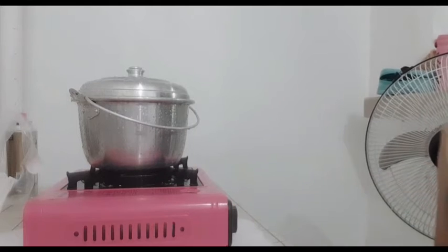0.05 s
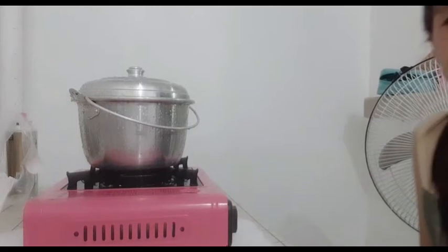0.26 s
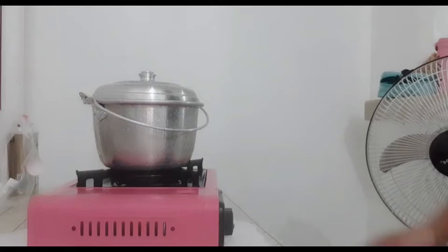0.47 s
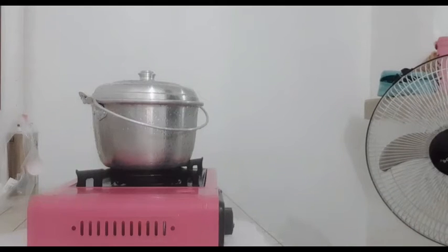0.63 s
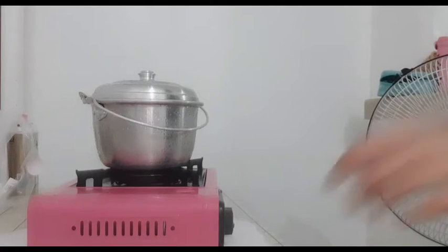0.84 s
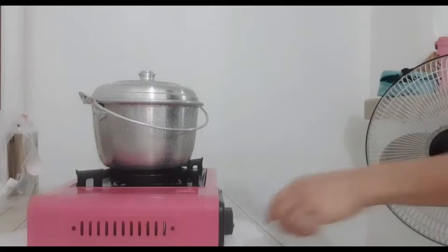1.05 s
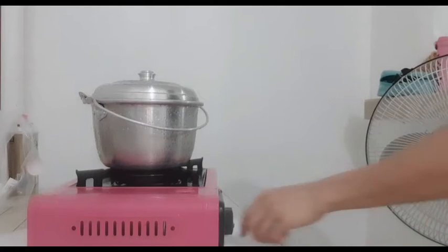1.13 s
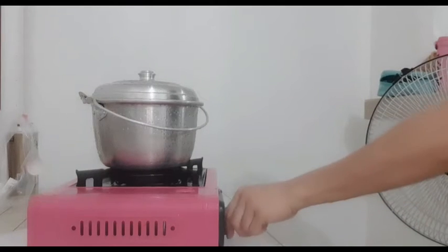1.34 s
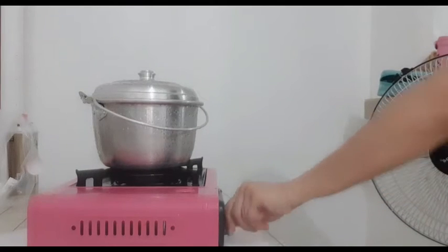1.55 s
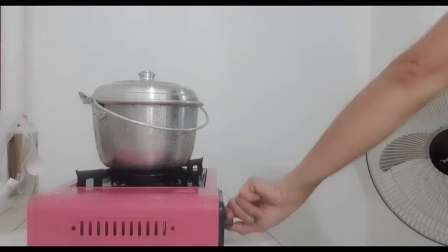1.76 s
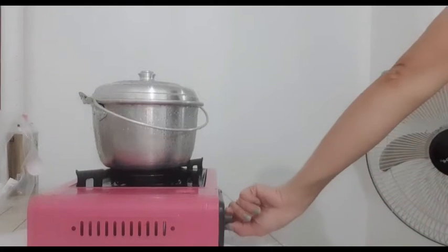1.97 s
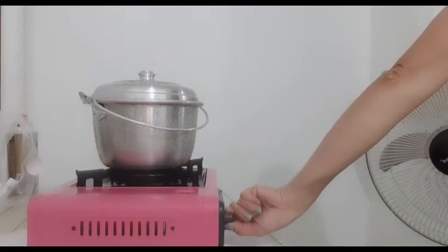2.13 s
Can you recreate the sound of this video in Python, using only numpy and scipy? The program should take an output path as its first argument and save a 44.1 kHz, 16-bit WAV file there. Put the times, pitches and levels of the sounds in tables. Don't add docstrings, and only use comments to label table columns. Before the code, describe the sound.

Portable gas stove igniter snaps with a metallic ring after latch clatter and bumps, then gas hisses softly

```python
import sys
import numpy as np
from scipy import signal
from scipy.fft import rfft, irfft
from scipy.io import wavfile
from scipy.ndimage import uniform_filter1d

SR = 44100
rng = np.random.default_rng(int(sys.argv[2]) if len(sys.argv) > 2 else 0)


def log_audio(samples):
    frames = np.atleast_2d(samples).T
    limited = np.clip(frames, -1, 1)
    pcm = np.round(limited * 32767).astype(np.int16)
    wavfile.write(sys.argv[1], SR, pcm)


def voltage_ratio(level):
    return 10 ** (np.asarray(level, float) / 20)


N = 97020
T = np.arange(N) / SR


def unit(x):
    return x / np.sqrt(np.mean(x ** 2))


def colour(x, shape):
    hz, db = np.array(shape, float).T
    f = np.maximum(np.fft.rfftfreq(len(x), 1 / SR), 1)
    gain_db = np.interp(np.log(f), np.log(hz), db, left=db[0] - 23)
    return irfft(rfft(x) * voltage_ratio(gain_db), len(x))


def walk(rate_hz):
    k = int(SR / rate_hz)
    drift = uniform_filter1d(rng.standard_normal(N), k)
    return unit(uniform_filter1d(drift, k))


def since(start_s):
    return np.clip(T - start_s, 0, 1)


def room():
    # band centre in Hz, t60 in s.
    decay = [(150, 0.23), (500, 0.58), (1500, 0.47), (4000, 0.43), (8000, 0.33), (14000, 0.41)]
    walls = []
    for hz, t60 in decay:
        band = [(hz / 4, -40), (hz / 2, -5), (hz, 0), (hz * 2, -5), (hz * 4, -40)]
        walls.append((colour(rng.standard_normal(N), band), voltage_ratio(-120 / t60 / SR)))
    return walls


def echoes(env, walls):
    room_db, rise_s = 6.5, 0.0072
    fill = np.exp(-1 / rise_s / SR)
    energy = signal.lfilter([1 - fill], [1, -fill], env ** 2)
    total = sum(np.var(band) / (1 - keep) for band, keep in walls)
    shift = rng.integers(N)
    tail = 0
    for band, keep in walls:
        tail = tail + np.roll(band, shift) * np.sqrt(signal.lfilter([1], [1, -keep], energy))
    return voltage_ratio(room_db) * tail / np.sqrt(total)


def ring(modes):
    t = T[:SR // 2]
    out = 0
    for hz, db, t60 in modes:
        out = out + voltage_ratio(db - 60 * t / t60) * np.sin(2 * np.pi * (hz * t + rng.random()))
    return out


def metal(hits, shape, modes, modes_db, walls):
    hit_rise_s, rattle_per_s, rattle_spread_db, modes_in_room_db = 0.00076, 14000, 1.6, -9
    env = 0
    for s, db, length_s in hits:
        rise = np.clip((T - s) / hit_rise_s, 0, 1)
        env = env + voltage_ratio(db) * rise * np.exp(-since(s) / length_s)
    contact = rng.random(N) < rattle_per_s / SR
    grains = contact * voltage_ratio(rattle_spread_db * rng.exponential(size=N)) * rng.standard_normal(N)
    push = env * unit(grains)
    tail = echoes(env, walls)
    drive = push + voltage_ratio(modes_in_room_db) * tail
    rung = voltage_ratio(modes_db) * signal.fftconvolve(drive, ring(modes))[:N]
    return rung + colour(push + tail, shape)


def latch(walls):
    # start in seconds, level in dB, rattle length in s.
    slide_hits = [
        (.1975, -30.5, 0.0023),
        (.2015, -24.5, 0.0052),
        (.21, -35.5, 0.008),
        (.2195, -27, 0.0096),
        (.2257, -28, 0.007),
        (.2322, -30.5, 0.011),
    ]
    latch_hits = [
        (.238, -26.5, 0.03),
        (.2513, -19, 0.0019),
        (.2545, -15.5, 0.0026),
        (.2605, -30, .004),
        (.2665, -17, 0.0039),
        (.282, -38, 0.009),
        (.30, -27, 0.017),
    ]
    # Hz, dB.
    slide_colour = [(60, -35), (200, -13), (800, 2), (1800, 4), (3200, -5), (5000, -4), (9000, -3),
                    (15500, -11.5)]
    latch_colour = [(60, -3), (150, -3), (300, 4.5), (800, -11.5), (1500, -5.5), (3700, 2.5), (8000, -5),
                    (15500, -8)]
    # Hz, dB, t60 in s.
    case_modes = [(193.4, -2.5, 0.091), (299, -0.5, 0.052), (411, -5, 0.059), (925, -35, 0.02),
                  (1407, -7, 0.059), (2620, -1, 0.012), (3290, 7, 0.017), (4640, -23, .006)]
    slide = metal(slide_hits, slide_colour, case_modes[:5], -31.5, walls)
    return slide + metal(latch_hits, latch_colour, case_modes, -33.0, walls)


def grip(walls):
    # start in seconds, level in dB, rattle length in s.
    tap_hits = [
        (1.2345, -44, 0.001),
    ]
    rub_hits = [
        (1.245, -55.5, 0.045),
    ]
    # Hz, dB.
    grip_colour = [(2500, -32), (4500, -2.5), (5500, -1), (6800, -8.5), (8000, -12), (9500, -5),
                   (11500, -16)]
    # Hz, dB, t60 in s.
    knob_modes = [(5830, 2, 0.0093), (8000, 0, 0.0089), (9230, -0.5, 0.0088), (10300, -10, 0.0095)]
    tap = metal(tap_hits, grip_colour, knob_modes, -14.5, walls)
    return tap + metal(rub_hits, grip_colour, knob_modes, -32, walls)


def knock():
    # start in seconds, level in dB, swell length in s.
    pushes = [
        (1.8145, -43, .012),
    ]
    # Hz, dB, t60 in s.
    panel_modes = [(806, 0, 0.18)]
    out = 0
    for s, db, swell_s in pushes:
        t = since(s)
        for hz, mode_db, t60 in panel_modes:
            level = voltage_ratio(db + mode_db - 60 * t / t60)
            out = out + level * (1 - np.exp(-t / swell_s)) * 2 * np.sin(2 * np.pi * hz * t)
    return out


def igniter(walls):
    # start in seconds, level in dB, rattle length in s.
    turn_hits = [
        (1.812, -44, 0.018),
        (1.819, -47, 0.015),
    ]
    snap_hits = [
        (1.8315, -19.5, 0.0027),
        (1.8355, -19, 0.0056),
        (1.843, -28, .0015),
        (1.8545, -22.5, 0.0025),
        (1.865, -36, 0.037),
    ]
    catch_hits = [
        (2.1955, -31, 0.0016),
    ]
    # Hz, dB.
    turn_colour = [(300, -44), (800, -5), (1500, 7), (2600, -6.5), (3800, 1), (6500, -18), (8000, -11),
                   (11000, -39)]
    snap_colour = [(100, -5), (300, -2.5), (900, -5), (1650, -2), (2300, -4), (3600, 1), (7760, -7.5),
                   (15500, -20)]
    catch_colour = [(500, -9), (1200, 4), (2100, 6.5), (2700, -10), (3600, 6), (4500, -20), (9000, -24)]
    # Hz, dB, t60 in s.
    case_modes = [(391, -13, 0.05), (797, -9, 0.095), (1015, -7.5, 0.16), (1450, -7.5, 0.063),
                  (1660, 2, 0.025), (2090, -10, 0.034), (3200, 0, 0.013), (3800, -18, 0.02),
                  (4960, -6, 0.012), (7700, -6, 0.036), (8100, 3, 0.021), (9200, 9.5, 0.0062)]
    turn = metal(turn_hits, turn_colour, case_modes[1:2], -33, walls)
    snap = metal(snap_hits, snap_colour, case_modes, -32.0, walls)
    return turn + snap + metal(catch_hits, catch_colour, case_modes, -62, walls)


def air(shape, flicker_db):
    bands = 0
    for hz in 30 * 2. ** np.arange(10):
        octave = [(hz / 2, -30), (hz / 1.59, -3), (hz, 0), (hz * 1.357, -3), (hz * 2, -30)]
        bands = bands + voltage_ratio(flicker_db * walk(8.7)) * colour(rng.standard_normal(N), octave)
    return unit(colour(bands, shape))


def whistle(track, waver_hz, flutter_db):
    s, hz, db = np.array(track, float).T
    pitch_hz = np.interp(T, s, hz) + waver_hz * walk(290)
    level_db = np.interp(T, s, db, left=-120) + 2.0 + flutter_db * walk(130)
    return voltage_ratio(level_db) * np.sin(2 * np.pi * np.cumsum(pitch_hz) / SR)


def gas():
    # Hz, dB.
    puff_colour = [(240, -19), (400, 1), (738, -11), (886, -44), (957, -30), (1660, -7), (2750, -17),
                   (3910, -1.5), (15500, -5)]
    seep_colour = [(2000, -22), (4000, -1), (4800, 4), (5600, -7), (6600, -12), (8000, -3.5), (10000, -15)]
    jet_colour = [(710, -21), (1200, -2.5), (1820, -17), (2590, -23), (5260, -3), (6650, -19),
                  (8240, -14.5), (9780, -23), (15500, -29)]
    # time in seconds, pitch in Hz, level in dB.
    high_track = [(1.97, 4790, -69), (2.0, 4920, -68), (2.03, 5060, -55), (2.08, 5250, -59),
                  (2.13, 5150, -77), (2.2, 5480, -69)]
    low_track = [(2.06, 930, -78), (2.08, 925, -63), (2.11, 925, -57.5), (2.15, 925, -58),
                 (2.2, 918, -58.5)]
    upper_track = [(2.05, 1096, -91), (2.07, 1078, -67), (2.11, 1050, -61.5), (2.2, 1015, -72)]
    puff_db, puff_hold_s, puff_fade_db_per_s = -50, 0.021, 53
    seep_db, seep_opens_s, seep_swell_s = -71, 1.536, 0.15
    jet_db, jet_opens_s, jet_rise_s = -58, 1.88, 0.08
    puff_level_db = puff_db - puff_fade_db_per_s * np.clip(T - puff_hold_s, 0, 3)
    puff = voltage_ratio(puff_level_db) * air(puff_colour, 0.6)
    swell = since(seep_opens_s) / seep_swell_s
    seep = voltage_ratio(seep_db) * swell * np.exp(1 - swell) * air(seep_colour, 0.59)
    jet = voltage_ratio(jet_db) * np.clip((T - jet_opens_s) / jet_rise_s, 0, 1) * air(jet_colour, 1.1)
    high = whistle(high_track, waver_hz=100, flutter_db=1.5)
    low = whistle(low_track, waver_hz=11, flutter_db=0.5)
    upper = whistle(upper_track, waver_hz=30, flutter_db=1.0)
    return puff + seep + jet + high + low + upper


def bumps():
    # start in seconds, peak in dB, pitch in Hz (minus for a pull), swell length in s, tick in dB.
    pushes = [(0.5265, -35, -190, 0.0013, -29), (.5283, -40, 125, 0.0032, -90), (.537, -40, -77, .005, -90),
              (0.5605, -33.5, 306, 0.0015, -80), (.637, -64, 463, 0.0072, -97),
              (.638, -42.5, 155, 0.0034, -97), (0.6411, -44, 334, 0.0013, -38.5),
              (0.649, -43.5, -550, 0.0028, -41.5), (.662, -79, -350, 0.0015, -55),
              (.664, -49, -68, .006, -86), (0.7434, -36, -350, 0.00085, -55), (.745, -40, 96, 0.0034, -88),
              (.7585, -37, 296, 0.0017, -95), (0.7617, -27.5, 280, 0.0032, -30),
              (0.7677, -33.5, -89, .0025, -90), (.7805, -40, 319, .002, -90),
              (0.7852, -30.5, 295, 0.0012, -20.5), (0.7905, -35.5, -400, 0.0015, -39),
              (.797, -64, 305, 0.004, -90), (0.851, -37.5, -260, 0.004, -67),
              (0.865, -44.5, 134, 0.0094, -88), (.868, -47, 309, 0.0063, -87),
              (.885, -53, 306, 0.0093, -70)]
    # Hz, dB.
    tick_colour = [(300, 2), (1000, -7.5), (2100, -3), (3000, -8.5), (4200, -1), (6000, -26), (8000, -17.5),
                   (13000, -29)]
    sag_per_s, tick_late_s, tick_t60_s = 25, 0.00095, 0.0012
    fizz_db, fizz_t60_s = -8.5, 0.045
    thud, tick, hiss = 0, 0, rng.standard_normal(N)
    for s, db, hz, swell_s, tick_db in pushes:
        t = since(s)
        turns = hz * np.log1p(sag_per_s * t) / sag_per_s
        swell = (t / swell_s * np.exp(1 - t / swell_s)) ** 2
        thud = thud - voltage_ratio(db) * swell * np.sin(2 * np.pi * turns)
        t = np.clip(t - tick_late_s, 0, 1)
        fizz = voltage_ratio(fizz_db - 60 * t / fizz_t60_s) * hiss
        click = np.sign(hz) * voltage_ratio(3.0 - 60 * t / tick_t60_s)
        tick = tick + (t > 0) * voltage_ratio(tick_db) * (fizz - click)
    return thud + colour(tick, tick_colour)


def stir():
    # Hz, dB.
    stir_colour = [(40, -28), (130, 0), (400, -0.5), (1200, -17), (2300, -14.5), (4000, -18), (7000, -39),
                   (12000, -53)]
    # time in seconds, level in dB.
    stir_level = [(0, -55.5), (.15, -68), (.185, -50.5), (.3, -65), (.5, -58.5), (.58, -55), (.65, -54.5),
                  (.7, -59), (.8, -53), (1.0, -69.5), (1.3, -98), (1.5, -94)]
    return voltage_ratio(np.interp(T, *np.array(stir_level).T)) * air(stir_colour, 1.5)


def hum():
    # Hz, dB.
    hum_colour = [(25, -21), (91, -3.5), (200, -8), (450, -14.5), (1000, -21), (3000, -27.5), (4400, -26.5),
                  (6500, -33), (15500, -32)]
    return voltage_ratio(-61) * air(hum_colour, 0.9)


def scene():
    walls = room()
    stove = latch(walls) + grip(walls) + knock() + igniter(walls)
    return (voltage_ratio(-4.5) * stove + gas() + bumps() + stir() + hum())[None]


def roll_off(x):
    return signal.sosfilt(signal.butter(12, 16310, fs=SR, output="sos"), x)


def record(dry):
    peak_hz, width_hz, peak_db = 7850, 640, -2
    fade_s, end_s, back_s, mute_db, rumble_db = 0.706, 0.719, 0.7405, -44, -29
    b, a = signal.iirpeak(peak_hz, peak_hz / width_hz, SR)
    x = dry + voltage_ratio(peak_db) * signal.lfilter(b, a, dry)
    x = signal.sosfilt(signal.butter(2, 50, "high", fs=SR, output="sos"), x)
    x = signal.sosfilt(signal.ellip(10, 0.2, 60, 15500, fs=SR, output="sos"), x)
    fade = np.clip((end_s - T) / (end_s - fade_s), 0, 1) ** 2
    gain = np.where(T < back_s, np.maximum(fade, voltage_ratio(mute_db)), 1)
    rumble = signal.sosfilt(signal.butter(4, 500, fs=SR, output="sos"), x)
    return roll_off(x * gain + voltage_ratio(rumble_db) * (1 - gain) * rumble)


dry = scene()
out = record(dry)
log_audio(out)
```